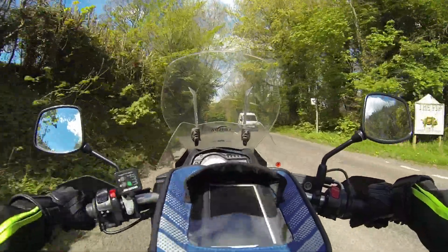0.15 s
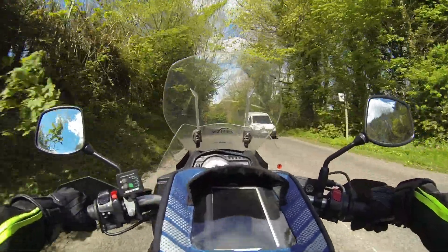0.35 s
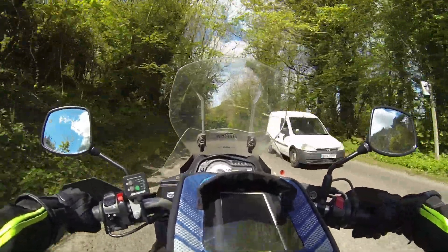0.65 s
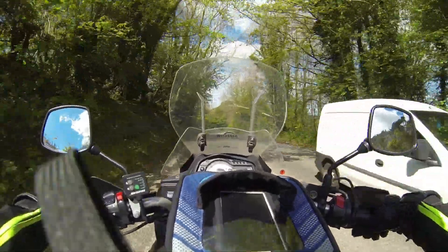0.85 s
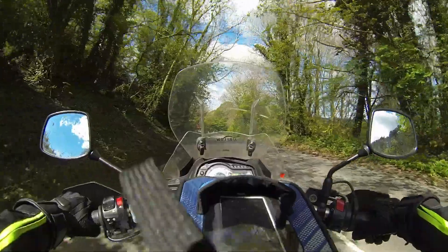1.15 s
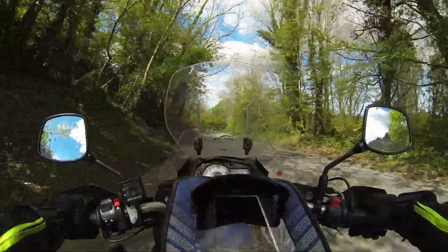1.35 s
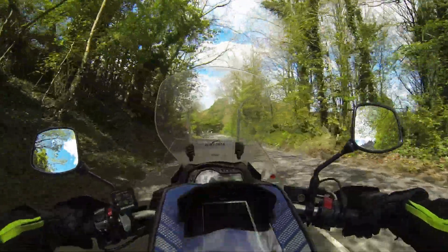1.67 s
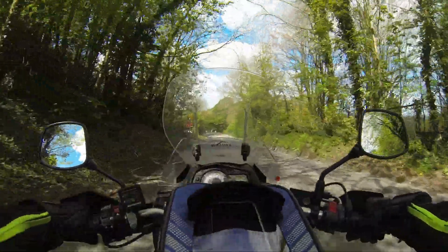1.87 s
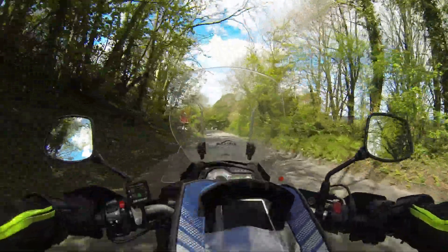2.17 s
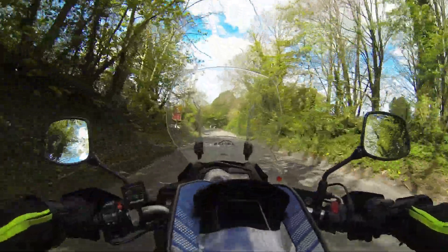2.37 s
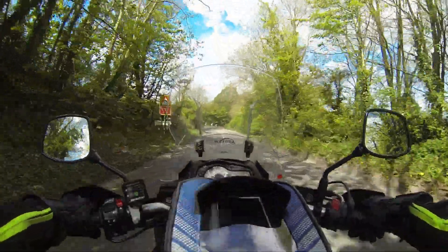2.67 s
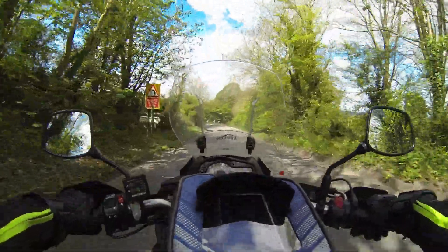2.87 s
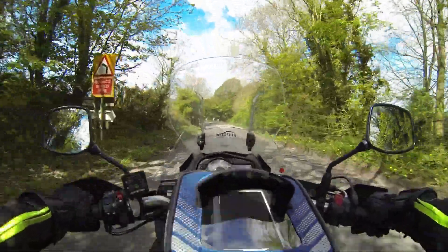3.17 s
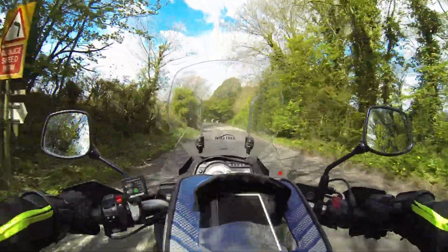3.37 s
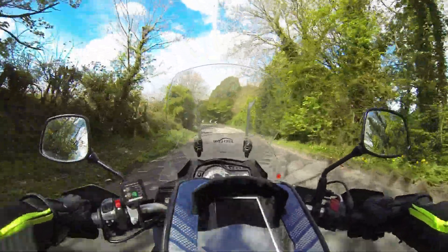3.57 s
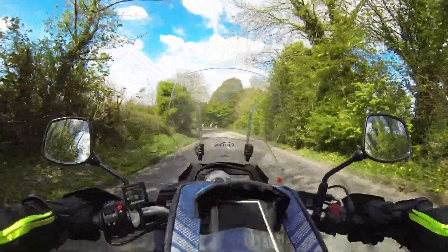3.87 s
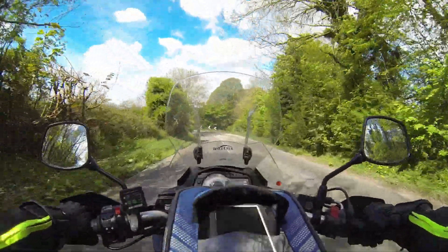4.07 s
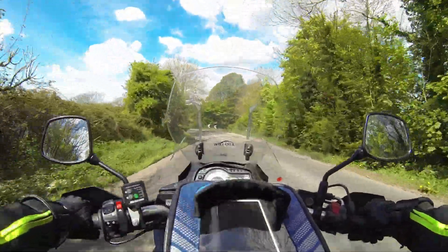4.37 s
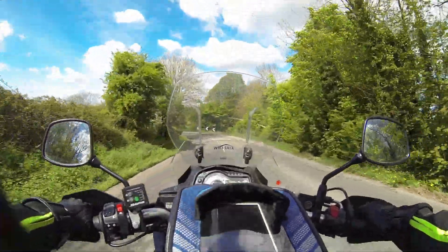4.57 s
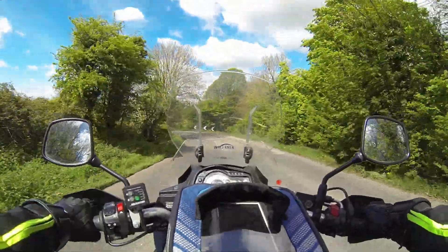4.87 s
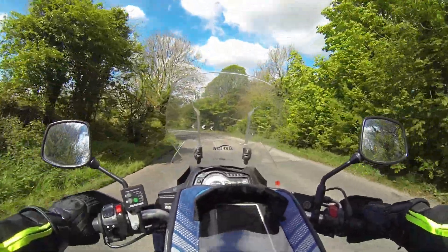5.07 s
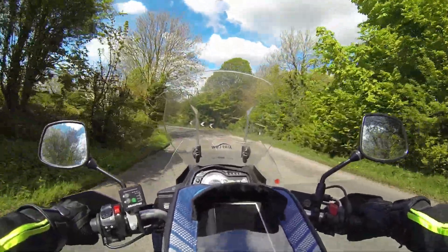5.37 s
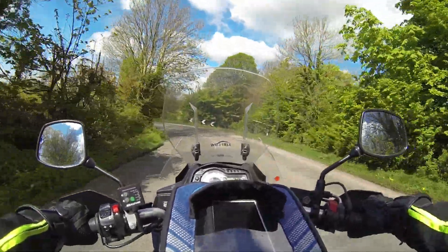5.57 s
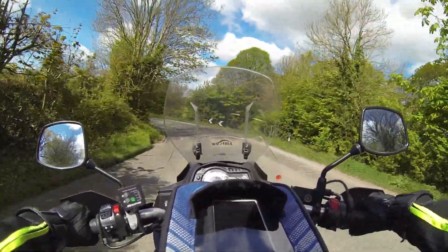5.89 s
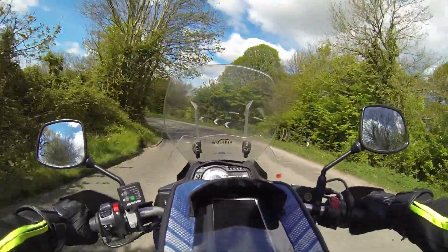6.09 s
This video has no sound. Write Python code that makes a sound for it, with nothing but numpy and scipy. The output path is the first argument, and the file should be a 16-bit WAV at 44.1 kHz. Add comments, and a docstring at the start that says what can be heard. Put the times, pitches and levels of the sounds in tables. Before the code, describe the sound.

Everything is very close and mono, inside wind striking a plastic case on a rider's chest. From 0 s the wind builds from moderate to a heavy, bass-rich buffeting near 0.9 s, with muffled roar, mid rush and thin hiss. A loose strap flaps throughout: dry buckle clacks at about 0.2, 0.9, 1.4, 1.7, 2.0, 2.3 and 3.2 s, with quick rebounds, soft slaps, low thumps and faint metallic ticks. The engine's low drone slowly sags, then jumps up just before 3 s on a downshift. Gliding gear whines stand out from 3.4 to 3.9 s as wind surges. At 4.4 s the revs jump again, and the hardest crack hits near 4.5 s. Wind falls away, surges at 5.0 s with another crack at 5.1 s, drops abruptly, then swells near 5.8 s with a double clack. A narrow airy hiss lingers while the engine sinks to the end.

```python
"""Wind rushes over a cased camera on a rider's chest as a motorcycle slows along a country lane.
From the start a loose strap flaps: coloured noise makes the wind and knocks, ringing tones the buckle's cracks.
The engine note, a stack of sine waves, sags beneath the rush and jumps up near 3 s as the bike changes down.
Gliding sines make gear whines, clearest before the second change down near 4.4 s, where the hardest crack falls.
Then the wind drops, surges and drops again while the buckle goes on cracking."""
import sys
import numpy as np
from scipy import signal
from scipy.fft import rfft, irfft
from scipy.io import wavfile
from scipy.ndimage import uniform_filter1d, minimum_filter1d

SR = 44100
rng = np.random.default_rng(int(sys.argv[2]) if len(sys.argv) > 2 else 0)


def wav_record(signal):
    """Record a signal, one row per channel, as 16-bit PCM in the file named by sys.argv[1]."""
    frames = np.transpose(np.atleast_2d(signal))
    bounded = np.clip(frames, -1, 1)
    # unit amplitude maps onto the largest positive 16-bit level
    quanta = np.round(bounded * 32767).astype(np.int16)
    wavfile.write(sys.argv[1], SR, quanta)


N = 274743
TIME = np.arange(N) / SR


def amp(db):
    """Turns decibels into a plain multiplier."""
    return 10 ** (np.asarray(db) / 20)


def evened(x):
    """Scales a sound to an average (rms) strength of one."""
    return x / np.sqrt(np.mean(x ** 2) + 1e-20)


def curves(rows):
    """Joins the rows of a table with straight lines and returns each column sample by sample."""
    times, *columns = np.transpose(rows)
    return [np.interp(TIME, times, column) for column in columns]


def add(mix, start_s, sound):
    """Mixes a sound in at the given time."""
    part = mix[max(round(start_s * SR), 0):][:len(sound)]
    part += sound[:len(part)]


def coloured(x, spectrum, size=8192):
    """Filters a sound to the given (frequency, level) shape, with no echo ahead of its start."""
    hz, db = np.transpose(spectrum)
    bin_hz = abs(np.fft.fftfreq(size, 1 / SR)) + 1  # the 1 avoids log(0)
    log_gain = np.log(amp(np.interp(np.log(bin_hz), np.log(hz), db)))
    # the Hilbert transform finds the phase that makes the filter respond as early as possible
    response = np.exp(np.conj(signal.hilbert(log_gain)))
    taps = np.fft.ifft(response).real[:size // 2]
    return signal.oaconvolve(x, taps)[:len(x)]


def wander(rate_hz):
    """Smooth random drift of unit rms, mostly slower than the given rate."""
    hz = np.fft.rfftfreq(N, 1 / SR)
    slow = rfft(rng.standard_normal(N)) * np.exp(-(hz / rate_hz) ** 2)
    return evened(irfft(slow, N))


def noise(spectrum):
    """Steady coloured noise of unit rms."""
    return evened(coloured(rng.standard_normal(N), spectrum))


def steadied(x, seconds):
    """Takes the slow swells out of a noise by dividing by its running strength."""
    power = uniform_filter1d(x ** 2, max(int(seconds * SR), 2))
    return x / np.sqrt(abs(power) + 1e-9)


def rung(modes, t):
    """Ringing tones that die away after a brief soft start; each blow lands a little differently."""
    swing = np.zeros(len(t))
    for hz, db, t60 in modes:
        level_db = db + 1.5 * rng.standard_normal() - 60 * t / t60
        swing += amp(level_db) * np.sin(2 * np.pi * hz * t)
    return swing * (1 - np.exp(-(t / 0.00027) ** 2))


# strength of the air flowing over the case: (time [s], level [dB])
AIRFLOW = [(0, -6.5), (.4, -2), (.85, 2.5), (1.35, 1.5), (1.52, -3), (1.8, 1.5), (2.6, 0), (3.3, -1.5),
           (3.65, -2.5), (3.85, 3), (4.1, -.5), (4.42, 0.5), (4.58, -6.5), (5.04, 3.5), (5.16, -7.5),
           (5.45, -6), (5.78, 0.5), (5.94, -3), (6.23, -2.5)]


def blown(level_db, slope):
    """Level in dB that follows the airflow: its value at 0 dB of flow, and dB gained per dB of flow."""
    return level_db + slope * curves(AIRFLOW)[0]


# single gusts that shake the case: (time [s], half length [s], lift [dB])
GUSTS = [(0.195, 0.043, 8.5), (0.41, 0.089, 4.5), (0.683, 0.055, 4.5), (0.814, 0.022, 5), (1.594, 0.047, 6),
         (1.88, 0.021, 9.5), (2.15, 0.081, 3), (2.582, 0.035, 3), (2.97, 0.081, 8), (3.163, 0.031, 6),
         (3.436, 0.079, 6.5), (3.945, 0.064, 6.5), (4.885, 0.062, 8), (5.567, 0.027, 6), (6.134, 0.044, 8)]
# tone colour of the four wind layers, from low to high: (frequency [Hz], relative level [dB per Hz])
BUFFET_COLOUR = [(8, -6.5), (18, 5), (30, 3.5), (70, 3), (115, 2.5), (150, -8), (220, -22), (400, -63.5),
                 (3000, -110)]
ROAR_COLOUR = [(80, -21.5), (150, 1.5), (210, 1), (300, -5.5), (400, -12), (550, -14.5), (720, -13.5),
               (1000, -29.5), (2000, -23), (5000, -45), (12000, -102)]
RUSH_COLOUR = [(300, -30.5), (800, -32.5), (1050, -18.5), (1270, -5.5), (1380, -4.5), (1500, 3.5),
               (1620, -0.5), (1750, -13), (1920, -22), (2320, -18.5), (2460, -23.5), (2580, -14.5),
               (2800, -25), (12000, -90.5)]
HISS_COLOUR = [(1500, 1.5), (2800, 11), (3600, 8.5), (4850, 0.5), (5220, 8), (5800, -4.5), (6500, 0.5),
               (7000, -3), (7700, -1), (9000, -12), (10200, -7.5), (11800, -16.5), (13900, -13),
               (15500, -48)]


def wind(lumps_db=1.2, lumps_hz=16, calming_db_per_s=0.9, roar_gust_share=0.54):
    """Gusts and eddies shake the case; the same eddies flutter the rush in its cavity and the hiss above."""
    gust_db = lumps_db * wander(lumps_hz)
    for peak_s, half_s, lift_db in GUSTS:
        gust_db += lift_db * np.exp(-((TIME - peak_s) / half_s) ** 2)
    eddies = wander(62)

    # the buffeting eases as the bike slows
    buffet_db = blown(-26.5, 1.0) + gust_db - calming_db_per_s * TIME
    roar_db = blown(-40.5, 1) + roar_gust_share * gust_db + 1.64 * eddies
    rush_db = blown(-39, 1.0) + 0.79 * eddies + 1.07 * wander(74)
    hiss_db = blown(-55.5, 0.91) + 0.36 * eddies + 0.92 * wander(52)

    buffet = amp(buffet_db) * steadied(noise(BUFFET_COLOUR), 0.14)
    roar = amp(roar_db) * steadied(noise(ROAR_COLOUR), 0.054)
    rush = amp(rush_db) * noise(RUSH_COLOUR)
    hiss = amp(hiss_db) * noise(HISS_COLOUR)
    return buffet + roar + rush + hiss


# body, crack and edge of a clack: (lowest frequency [Hz], highest frequency [Hz])
CLACK_BANDS = [(1200, 2000), (2000, 4200), (5000, 11000)]


def voiced(sound, levels_db):
    """Tilts a blow smoothly to bring its body, crack and edge towards the given levels (rms over 10 ms)."""
    spectrum, hz = rfft(sound), np.fft.rfftfreq(len(sound), 1 / SR)
    power = []
    for low_hz, high_hz in CLACK_BANDS:
        band = spectrum[(hz > low_hz) & (hz < high_hz)]
        power.append(2 * np.sum(abs(band) ** 2) / len(sound) / (.01 * SR))
    lift_db = np.array(levels_db) - 10 * np.log10(power)
    # one lift for the body, one held across the crack, one for the edge
    tilt_db = np.interp(hz, [1870, 2600, 3530, 6400], np.repeat(lift_db, [1, 2, 1]))
    return irfft(spectrum * amp(tilt_db), len(sound))


# blows of the buckle on the case: (time [s], relative crack level [dB], relative body level [dB])
CLACKS = [(0.2295, -15.5, -20), (0.2449, -34, -31), (.2816, -48, -46), (.323, -48, -40), (.9156, -14, -14),
          (.9414, -34, -32), (.946, -26, -37), (1.0184, -22.5, -20.5), (1.2229, -28.5, -23),
          (1.2296, -31.5, -32), (1.2372, -32, -28.5), (1.4454, -17, -14), (1.4525, -27.5, -20),
          (1.461, -35, -25.5), (1.7391, -17, -23), (1.764, -36.5, -36), (1.8309, -31, -32.5),
          (2.0487, -14, -19), (2.065, -41, -28), (2.0871, -24, -29), (2.1192, -33, -34), (2.127, -40, -35),
          (2.172, -42, -41), (2.304, -14.5, -23.5), (2.3349, -38, -30), (2.452, -38.5, -56),
          (2.606, -39.5, -67), (3.1963, -15.5, -18.5), (3.377, -35, -39), (3.993, -35.5, -34),
          (4.2134, -42.5, -36.5), (4.477, -10, -17.5), (4.492, -27, -24), (4.55, -30, -34),
          (5.077, -12, -15), (5.1337, -41, -37), (5.836, -13, -21), (5.8541, -19, -20), (5.867, -34, -26),
          (5.8893, -32, -31)]
# tone colour of the plastic case: (frequency [Hz], relative level [dB])
CASE_COLOUR = [(300, -21), (1000, -11), (1500, 8.5), (2420, 8), (2630, -0.5), (2780, 5.5), (3750, 5),
               (4450, -14), (5800, -9), (6520, -19.5), (7050, -15.5), (10500, -31), (11200, -35.5),
               (14500, -43), (16000, -58)]
# ringing tones of the case: (frequency [Hz], relative level [dB], time to fall by 60 dB [s])
CASE_RING = [(1530, -15, .04), (1870, -18, .03), (2350, -19, .02), (3710, -18, .025)]
# ringing tones of the buckle: (frequency [Hz], relative level [dB], time to fall by 60 dB [s])
BUCKLE_RING = [(2299, -45, .14), (2525, -33, .15), (3531, -41, .15), (4054, -50, .15), (4290, -42, .12),
               (4996, -48, .09)]


def buckle(chatter_s=0.0052, contacts_per_s=2200, scrape=0.2,
           rattle_db=-13, rattle_s=0.0058, rattles_per_s=500, size=8192):
    """A hard contact, a few quick rebounds and a loose rattle set the plastic case and buckle ringing."""
    out, t = np.zeros(N), np.arange(size) / SR
    lead = np.zeros(size // 64)  # silence ahead of the blow leaves room for the tilt
    for start_s, crack_db, body_db in CLACKS:
        edge_db = -8 + 1.32 * crack_db  # harder blows are brighter: the edge grows faster than the crack
        rebounds = rng.choice([-1, 1], size) * (rng.random(size) < contacts_per_s / SR)
        contact = rebounds + scrape * rng.standard_normal(size)
        contact *= np.exp(-(t / chatter_s) ** 2)
        contact[0] = 2.4  # a strong first contact

        touches = rng.standard_normal(size) * (rng.random(size) < rattles_per_s / SR)
        rattle = touches * np.exp(-t / rattle_s)
        dulled = signal.lfilter(signal.windows.hann(13), 1, rattle)  # light touches are duller
        contact += amp(rattle_db) * dulled

        crack = coloured(contact, CASE_COLOUR)
        ringing = rung(CASE_RING, t) + amp(-1.5) * rung(BUCKLE_RING, t)
        blow = np.r_[lead, crack / abs(crack).max() + ringing]
        add(out, start_s - len(lead) / SR, voiced(blow, (body_db, crack_db, edge_db)))
    return amp(0.46) * out


# soft strap striking the case: (time [s], relative slap level [dB], relative thump level [dB])
KNOCKS = [(.073, -35, -35), (.701, -24.5, -51), (1.115, -25, -39), (1.17, -28, -38), (1.223, -17.5, -33),
          (1.961, -18.5, -23.5), (2.444, -19.5, -24), (2.709, -25.5, -25), (2.891, -28.5, -31),
          (3.122, -29, -47), (3.219, -27.5, -30.5), (3.495, -27.5, -27.5), (3.564, -30, -24.5),
          (3.762, -19.5, -20.5), (4, -39, -21), (4.063, -28.5, -38), (4.407, -30, -31.5), (4.624, -27, -37),
          (4.856, -19, -29.5), (5.202, -25, -38), (5.575, -39, -35)]
# tone colour of the slap: (frequency [Hz], relative level [dB per Hz])
SLAP_COLOUR = [(150, -12.5), (500, -9.5), (680, 1.5), (830, 1.5), (1100, -8.5), (1500, 5), (1900, -15.5),
               (2600, -11.5), (3500, -37), (12000, -71)]
# tone colour of the low push under it: (frequency [Hz], relative level [dB per Hz])
THUMP_COLOUR = [(40, -22), (150, 0.5), (350, -13), (550, -26.5), (1200, -28), (8000, -72)]


def webbing(slap_s=0.0079, thump_s=.0083, size=4096):
    """The soft strap lands with a short slap and a low thump, both quickly fading noise."""
    out, t = np.zeros(N), np.arange(size) / SR
    for start_s, slap_db, thump_db in KNOCKS:
        slap = evened(coloured(rng.standard_normal(size) * np.exp(-t / slap_s), SLAP_COLOUR))
        thump = evened(coloured(rng.standard_normal(size), THUMP_COLOUR)) * np.exp(-t / thump_s)
        add(out, start_s, amp(slap_db - 15.5) * slap + amp(thump_db + 6) * thump)
    return out


# a small metal tag ticking: (time [s], relative level [dB])
TICKS = [(.8056, -35.5), (1.08, -39), (1.141, -31), (1.2615, -37), (1.3718, -37), (2.9511, -44),
         (3.111, -35.5), (3.377, -32), (3.4391, -44), (4.632, -40), (5.01, -42), (5.188, -38), (5.295, -46),
         (5.9523, -41)]
# low and high ringing tones of the tag: (frequency [Hz], relative level [dB], time to fall by 60 dB [s])
TAG_LOW = [(3454, 15, 0.027), (3640, 12, 0.018), (4200, 4, 0.022), (4715, -12, 0.075)]
TAG_HIGH = [(7500, -1, 0.022), (7600, 7.5, 0.0085), (8100, -8, 0.019), (10460, -11, 0.0098),
            (13600, -9, .006)]


def tag(scrape_s=0.0018, bounce_s=.008, bounce_db=-6, high_db=-28, low_db=-24,
        shivers_per_s=30, shiver_db=-62, shiver_slope=1.5, size=4096):
    """A small metal tag ticks and bounces against its zip, and shivers more strongly in stronger air."""
    out, t = np.zeros(N), np.arange(size) / SR
    for start_s, db in TICKS:
        for delay_s, drop_db in (0, 0), (bounce_s, bounce_db):
            scrape = rng.standard_normal(size) * np.exp(-t / scrape_s)
            high = evened(signal.fftconvolve(scrape, rung(TAG_HIGH, t))[:size])
            low = evened(signal.fftconvolve(scrape, rung(TAG_LOW, t))[:size])
            tick = amp(high_db) * high + amp(low_db) * low
            add(out, start_s + delay_s, amp(db + drop_db) * tick)
    touches = rng.random(N) * (rng.random(N) < shivers_per_s / SR)
    touches *= amp(blown(shiver_db, shiver_slope))
    return out + signal.oaconvolve(touches, rung(TAG_HIGH, t))[:N]


# narrow hiss against the airflow: (time [s], level [dB])
EDGE_TONE = [(0, -55), (.9, -59), (2.8, -68), (3.7, -78), (4.4, -52), (5.08, -51), (5.25, -52), (5.75, -56),
             (6.23, -54.5)]
# tone colour of that hiss as air slips past the case: (frequency [Hz], relative level [dB per Hz])
EDGE_COLOUR = [(1500, -53), (2400, -15), (2540, 0), (2590, 6), (2660, -16), (2850, -20), (6000, -73)]


def edge_tone():
    """Air slipping past the case adds an airy, hardly pitched whistle made of narrow noise."""
    level_db = blown(0, 1) + curves(EDGE_TONE)[0] + 0.6 * wander(28)
    return amp(level_db) * noise(EDGE_COLOUR)


# revs sag as the bike slows and jump at each change down:
# (time [s], crankshaft speed [turns per s], relative exhaust level [dB])
ENGINE = [(0, 75.3, -50), (.75, 72.2, -42), (1.7, 68.8, -47), (2.8, 66, -48), (2.97, 76, -44),
          (4.15, 70, -46.5), (4.42, 79, -45), (5.3, 74.5, -45), (6.23, 67.2, -46)]
# tones of the exhaust note: (multiple of the crank speed, relative level [dB])
EXHAUST = [(1, -5), (1.5, 2.5), (2, -7), (2.5, -13), (3, -2.5), (3.5, -15), (4, -7), (4.5, -19), (5.5, -18),
           (6, -15), (7, -21)]


def engine():
    """Uneven firing gives tones at half and whole multiples of the crank speed, each a little unsteady."""
    crank_hz, level_db = curves(ENGINE)
    turns = np.cumsum(crank_hz * (1 + .0025 * wander(25))) / SR
    note = np.zeros(N)
    for multiple, db in EXHAUST:
        tone = np.sin(2 * np.pi * (multiple * turns + rng.random()))
        note += amp(db + 2 * wander(29)) * tone
    return amp(level_db - 1) * np.sqrt(2) * note


def swell(peak_s, rise_s, fall_s):
    """Distance from a peak, counted in rise times before it and fall times after it."""
    before = (peak_s - TIME) / max(rise_s, .01)
    after = (TIME - peak_s) / max(fall_s, .01)
    return np.maximum(before, after)


# a gear pair sings while it is loaded: (time at its loudest [s], rise [s], fall [s],
# pitch at that time [Hz], level [dB], pitch sag [share per s])
GEAR_WHINES = [(0.752, 0.96, 0.97, 1460, -43, .05), (2.85, 0.24, 0.16, 1305, -48, .05),
               (3.46, 0.05, 0.22, 1461, -36.5, .065), (3.84, 0.38, 0.13, 1432, -38, .065),
               (4.05, .7, 0.51, 699, -50, .08), (5.4, 0.68, 2.1, 638, -59.5, 0.068),
               (5.62, 0.13, 1.2, 1270, -53, .09)]


def gears(waver_db=3, jitter=0.00301, fade_db=12):
    """Meshing teeth whine: tones swell, fade and glide down as the bike slows, wavering in pitch and strength."""
    out = np.zeros(N)
    for peak_s, rise_s, fall_s, hz, db, sag in GEAR_WHINES:
        glide_hz = hz * np.exp(-sag * (TIME - peak_s))
        phase = 2 * np.pi * np.cumsum(glide_hz * (1 + jitter * wander(77.0))) / SR
        # fade_db is the drop one rise time before the peak or one fall time after it
        level_db = db - fade_db * swell(peak_s, rise_s, fall_s) ** 2 + waver_db * wander(24)
        out += amp(level_db) * np.sqrt(2) * np.sin(phase)
    return out


def scene():
    """Wind, strap and bike together, all close to the case."""
    strap = buckle() + webbing() + tag()
    bike = engine() + gears()
    return (wind() + strap + edge_tone() + bike)[None]


def limited(x, ceiling=0.91, size=45):
    """A fast peak limiter: the gain dips for about two milliseconds round each overload."""
    gain = np.minimum(1, ceiling / (abs(x) + 1e-9))
    return x * uniform_filter1d(minimum_filter1d(gain, size), size)


def record(dry, top_hz=16600):
    """Adds a faint electronic whistle, limits the peaks, then cuts the highest treble."""
    whistle = amp(-83.5) * np.sin(2 * np.pi * 11000 * TIME)
    treble_cut = signal.firwin(511, top_hz, window=("kaiser", 9), fs=SR)
    return signal.oaconvolve(limited(dry + whistle), treble_cut[None], "same")


dry = scene()
out = record(dry)
wav_record(out)
```